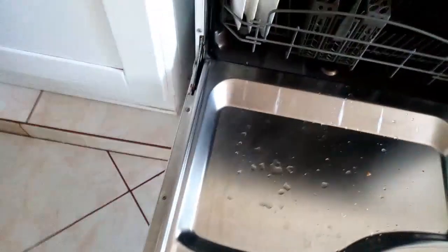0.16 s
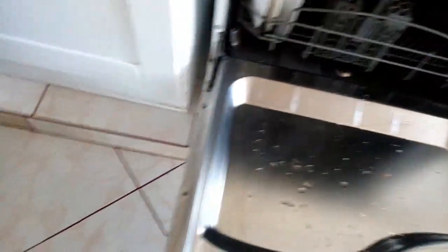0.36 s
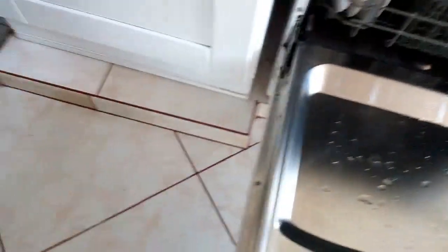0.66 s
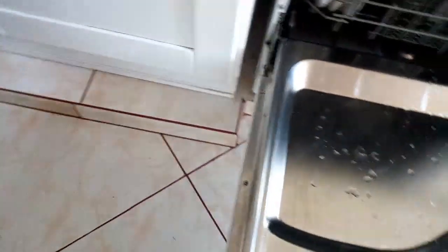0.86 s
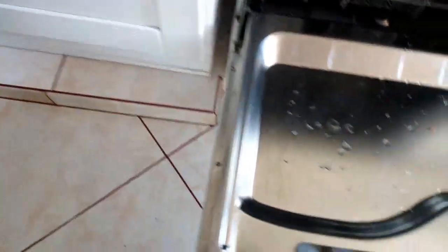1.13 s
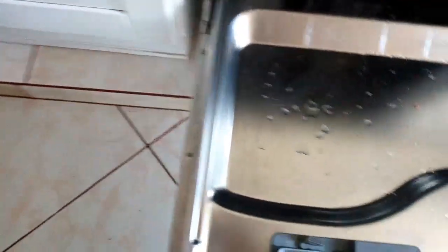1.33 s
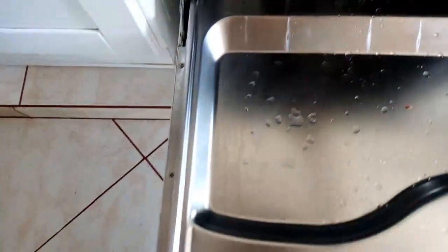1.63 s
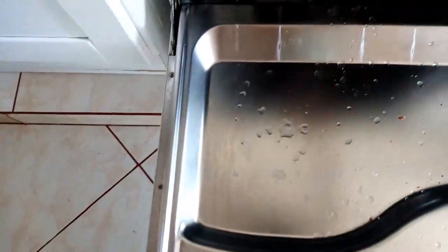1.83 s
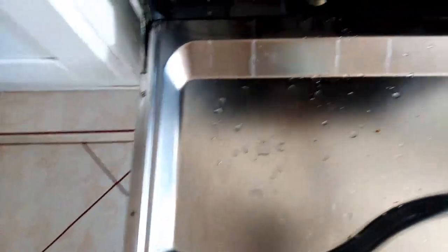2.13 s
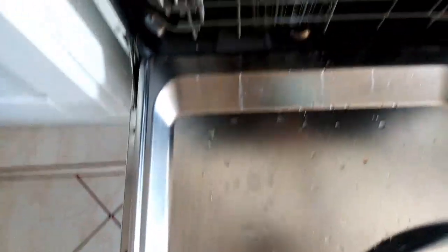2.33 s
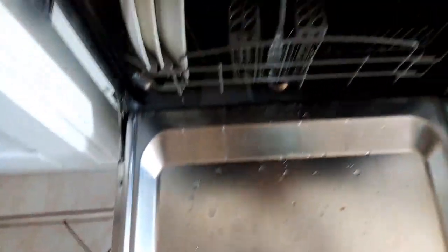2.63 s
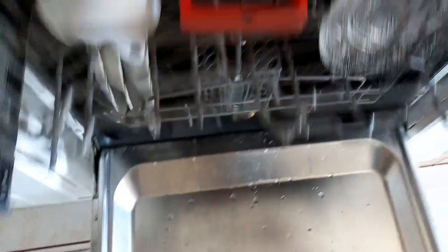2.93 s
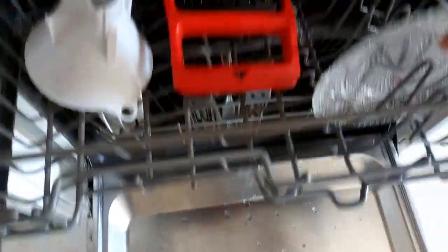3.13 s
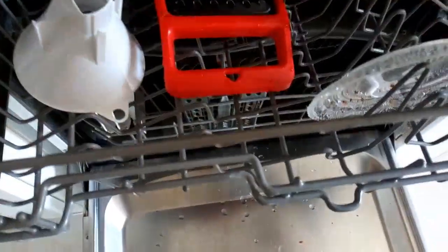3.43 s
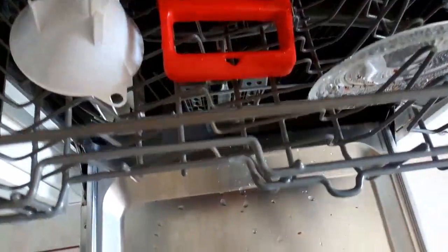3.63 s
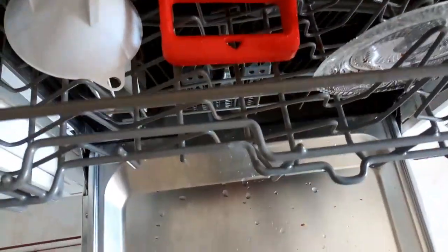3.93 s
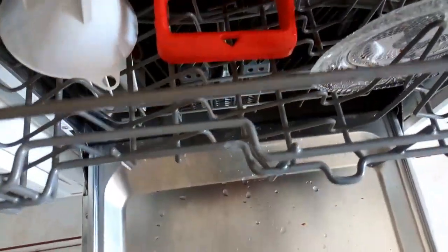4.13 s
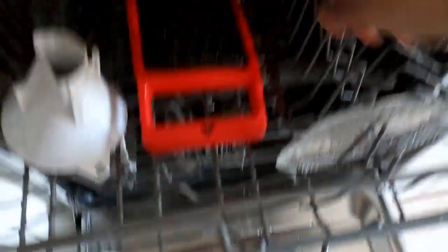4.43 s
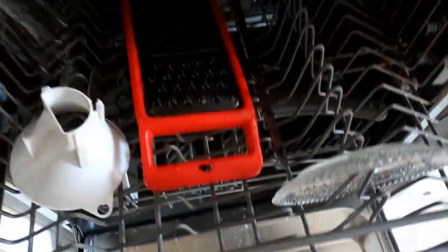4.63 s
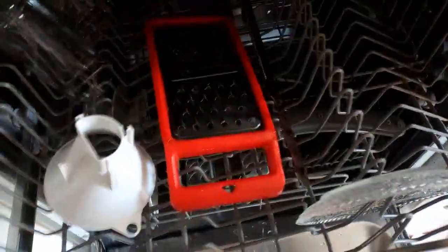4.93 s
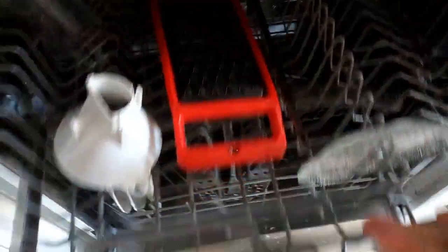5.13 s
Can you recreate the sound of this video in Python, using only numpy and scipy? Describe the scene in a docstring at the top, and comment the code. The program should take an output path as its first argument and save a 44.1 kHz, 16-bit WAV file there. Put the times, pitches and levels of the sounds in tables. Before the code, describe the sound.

Dishwasher racks roll and rattle in a tiled kitchen, with a crockery clatter, a hollow door clunk and sharp glassy clinks on wires.

```python
"""Loading an open dishwasher

Over a faint hush in a tiled kitchen, china scrapes and crockery clatters down a little way off. The door drops
onto its stop, the lower rack rolls out, then the upper rack is pulled and shoved so a glass dish chatters on its wires.
Knocks ring sine modes and coloured noise in door, tub and wires; wheels drive them with random tiny bumps.
The glass is choked sines with a shaken pitch, and decaying noise gives the hard room's echoes."""
import sys
import numpy as np
from scipy import signal
from scipy.fft import rfft, irfft, next_fast_len
from scipy.io import wavfile
from scipy.ndimage import uniform_filter1d

SR = 44100
rng = np.random.default_rng(int(sys.argv[2]) if len(sys.argv) > 2 else 0)


def transcribe(signal):
    """Save signal, clipped to [-1, 1], as a 16-bit WAV file at the path in sys.argv[1]."""
    frames = np.atleast_2d(signal).T
    limited = np.clip(frames, -1, 1)
    pcm = np.round(limited * 32767).astype(np.int16)
    wavfile.write(sys.argv[1], SR, pcm)


N = 232142
AGE = np.arange(int(.7 * SR)) / SR  # time since a blow, s

# main ringing modes of each body: f/Hz, relative level/dB, t60/s
DOOR_MODES = [(90, 3.5, 0.2), (109, 7, 0.052), (128.5, 7.5, 0.15), (194.3, -3, 0.16), (220, -5.5, 0.28),
              (274, -12.5, 0.13), (302.6, -7, .3)]
TUB_MODES = [(325.7, 14, 0.26), (396, -11, 0.17), (469, -2.5, 0.35), (583, 1, 0.21), (626, 1, 0.43),
             (698.4, 13, 0.5), (750, -6, 0.1), (1008, 6, 0.28), (1424, -6.5, 0.14), (1993, 2, 0.11),
             (2114, -9.5, 0.13)]
WIRE_MODES = [(2580, 1, 0.12), (3095, 6.5, 0.18), (3470, -6.5, 0.3), (3760, -5, 0.31), (3900, 13, 0.039),
              (4030, -2, .14), (4640, -5.5, 0.17), (5050, -23.5, .12), (5576, -4, 0.22), (5660, -0.5, 0.13),
              (6080, -1.5, 0.13), (6350, -19, .12)]
CROCKERY_MODES = [(580, -11.5, 0.23), (1002, -13.5, 0.23), (1570, -6, .25), (1900, -1, 0.32),
                  (2060, -1.5, 0.082), (2664, -6.5, .35), (3490, -4.5, 0.28), (4150, -19, .3),
                  (3616, -19, .3), (3980, -2.5, 0.27), (4410, -7, 0.28), (4510, -18, 0.38), (5280, -11, .3),
                  (5760, -7.5, 0.34), (6148, -4, 0.14), (6440, -15, 0.096), (7280, -15.5, 0.4),
                  (9356, -25.5, .3)]

# colour of the crowd of weak, close modes around those: f/Hz, relative density/dB per Hz
DOOR_WASH = [(30, -12.5), (70, -6.5), (120, -1), (220, -2.5), (320, -2.5), (600, -35), (2000, -80)]
TUB_WASH = [(120, -26), (260, 2.5), (650, 3.5), (900, -2.5), (2000, -7), (3000, -11), (5000, -33),
            (9000, -48.5)]
WIRE_WASH = [(400, -39), (1500, -2), (2600, -2), (4200, 13), (5600, 5.5), (6500, 0.5), (7800, -20.5),
             (11000, -51.5), (16000, -57.5)]
CROCKERY_WASH = [(60, -34.5), (200, -14), (530, -2.5), (1100, -3), (2000, 3), (3000, -1), (4500, 1.5),
                 (6000, -3.5), (7000, -14.5), (8000, -23.5), (12000, -33), (15500, -28.5)]


def amp(db):
    """Decibels to gain."""
    return 10 ** (np.asarray(db) / 20)


def unit(x):
    """Scale each row to an energy of 1."""
    return x / np.sqrt(np.sum(x ** 2, axis=-1, keepdims=True))


def fade(t60):
    """An exponential decay that has lost 60 dB after t60 seconds."""
    return np.exp(-np.log(1000) * AGE / t60)


def fft_bins(size):
    """Frequencies of a real spectrum in Hz, kept above zero for the logarithm."""
    return np.maximum(np.arange(size // 2 + 1) * SR / size, 1)


def noise(spectrum, shape, patchy_db=0):
    """Coloured noise of overall rms 1; random humps of patchy_db rms make each row's spectrum its own."""
    hz, db = np.transpose(spectrum)
    size = next_fast_len(shape[-1])
    bins = fft_bins(size)
    hump_width = int(260 * size / SR)  # 260 Hz, in bins
    humps = uniform_filter1d(rng.standard_normal(shape[:-1] + bins.shape), hump_width, mode="wrap")
    colour_db = np.interp(np.log(bins), np.log(hz), db) + patchy_db * humps / humps.std()
    white = rng.standard_normal(shape[:-1] + (size,))
    x = irfft(rfft(white) * amp(colour_db), size)
    return x[..., :shape[-1]] / x.std()


def ring(modes, count, spread_db):
    """Decaying sines for each blow; where it lands sets the strength and sign of every mode."""
    hz, db, t60 = np.transpose(modes)[:, :, None]
    chance = rng.standard_normal((count, 2, len(modes)))
    weights = np.sign(chance[:, 0]) * amp(spread_db * chance[:, 1])
    partials = amp(db) * np.sin(2 * np.pi * hz * AGE) * fade(t60)
    return unit(weights @ partials)


def wash(spectrum, count, t60, patchy_db=2):
    """Modes too close to tell apart, as noise dying away together after each blow."""
    return unit(noise(spectrum, (count, len(AGE)), patchy_db) * fade(t60))


def swell(sounds, rise_s):
    """A soft or rattling contact takes a moment to set things going."""
    return sounds * (1 - np.exp(-AGE / rise_s))


def add_echoes(sounds, room, wet_db):
    """Mix each sound with its echoes, wet_db in energy relative to the dry sound."""
    echoes = signal.fftconvolve(sounds, room[None], axes=1)[:, :len(AGE)]
    return unit(sounds) + amp(wet_db) * unit(echoes)


def play(sounds, times, db, room, wet_db):
    """Give each sound its echoes and set it at its time; db is the rms of its first 25 ms."""
    sounds = add_echoes(sounds, room, wet_db)
    out = np.zeros(N + len(AGE))
    head = int(.025 * SR)
    for sound, s, gain in zip(sounds, times, amp(db)):
        start = int(s * SR)
        out[start:start + len(AGE)] += gain * sound / sound[:head].std()
    return out[:N]


def rub(curve, modes, spectrum, room, bumps_per_s, t60, ring_db):
    """Small bumps of very uneven size, shared by four contacts with their own rings, follow a t/s, drive/dB curve."""
    s, db = curve
    drive_db = np.interp(np.arange(N) / SR, s, db)
    bumps = (rng.random((4, N)) < bumps_per_s / 4 / SR) * rng.laplace(size=(4, N))
    rings = amp(ring_db) * ring(modes, count=4, spread_db=3.5)
    bodies = unit(rings + wash(spectrum, count=4, t60=t60, patchy_db=-3.0))
    bodies = unit(add_echoes(bodies, room, wet_db=-8.5))
    driven = amp(drive_db) * bumps / bumps.sum(0).std()
    return signal.fftconvolve(driven, bodies, axes=1).sum(0)[:N]


def kitchen(build_s):
    """The room's answer: echoes thicken, then die, the treble first."""
    # decay of the hard room: f/Hz, t60/s
    room_decay = [(100, 0.66), (500, 0.53), (2000, 0.56), (5000, 0.46), (9000, 0.36), (15000, 0.14)]
    hz, t60 = np.transpose(room_decay)
    bins = fft_bins(len(AGE))
    echoes = rfft(rng.standard_normal(len(AGE)))
    tail = np.zeros(len(AGE))
    # overlapping bands, each peaking at one listed frequency
    for share, band_t60 in zip(np.eye(len(hz)), t60):
        weight = np.interp(np.log(bins), np.log(hz), share)
        tail += irfft(echoes * weight, len(AGE)) * fade(band_t60)
    return unit(swell(tail, build_s))


def hush():
    """The kitchen's faint background is steady coloured noise."""
    # colour of the hush: f/Hz, relative density/dB per Hz
    hush_colour = [(25, -14.5), (48, 7.5), (70, -8.5), (98, 8.5), (125, -7.5), (220, -5), (320, -10),
                   (1500, -18.5), (1950, -14.5), (2400, -26), (4700, -21.5), (7000, -27.5), (8200, -37.5),
                   (13000, -37.5), (15500, -31)]
    return amp(-68.5) * noise(hush_colour, (N,))


def sliding(room):
    """A dish slides faintly across the room: china scrapes in a dense run of tiny slips."""
    # strength of the scrape: t/s, drive level/dB
    scrape = [(0, -53.5), (.05, -75), (.2, -99), (.28, -65.5), (.38, -73.5), (.48, -85.5)]
    return rub(np.transpose(scrape), CROCKERY_MODES, CROCKERY_WASH, room, bumps_per_s=400, t60=0.21, ring_db=-12.5)


def crockery(room):
    """Plates land and settle in a few quick blows, heard mostly by way of the walls."""
    # crockery set down across the room: t/s, level/dB, brightness/dB per octave
    clatter = [(.055, -50, -4), (.766, -57.5, -0.5), (.786, -50.5, -0.5), (.806, -29, 3.5), (.812, -29, -1),
               (.843, -29, 5), (.858, -29.5, 1.5), (.888, -42.5, -15.5), (.922, -44, 1)]
    s, db, tilt_db = np.transpose(clatter)
    blows = amp(-12) * ring(CROCKERY_MODES, len(s), spread_db=6.5) + wash(CROCKERY_WASH, len(s), t60=0.11)
    blows = swell(blows, rise_s=0.006)
    # the tilt pivots at 2 kHz and levels off below 500 Hz and above 9 kHz
    octaves = np.log2(np.clip(fft_bins(len(AGE)), 500, 9000) / 2000)
    blows = irfft(rfft(blows) * amp(tilt_db[:, None] * octaves), len(AGE))
    return play(blows, s, db, room, wet_db=-0.5)


def taps(modes, table, room, rise_s, wet_db):
    """One loose thing rings with the same modes at each of its taps."""
    s, db = np.transpose(table)
    rings = ring(modes, len(s), spread_db=1.0)
    return play(swell(rings, rise_s), s, db, room, wet_db)


def loose_things(room):
    """A plate, cutlery, a cup and the dish jumped clear of the wires ring their own modes over the clatter."""
    # what loose things ring with: f/Hz, relative level/dB, t60/s
    plate_modes = [(554, 2, 0.18), (2020, 2, .4), (2540, -6, .42), (4290, -0.5, 0.55), (4470, 2.5, 0.29),
                   (4520, -2.5, .25)]
    cutlery_modes = [(533, -6.5, 0.13), (1500, -11, 0.045), (2568, -5.5, 0.13), (2800, -3.5, 0.043),
                     (4400, 0, 0.12), (4605, 5, .08)]
    cup_modes = [(1660, -11.5, .04), (1930, -9.5, 0.043), (2150, -13.5, 0.02), (3350, -6, .09),
                 (3920, 5, 0.036), (5380, -2.5, .045), (5840, -1.5, .05)]
    free_glass_modes = [(3480, 5.5, 0.26), (9350, -17, 0.18)]
    # their taps: t/s, level/dB
    plate_taps = [(.812, -39), (.845, -37)]
    cutlery_taps = [(2.284, -44), (2.615, -46.5)]
    cup_taps = [(3.279, -29), (3.3263, -31)]
    glass_jumps = [(3.34, -49.5), (4.416, -48)]
    return (taps(plate_modes, plate_taps, room, rise_s=0.0027, wet_db=-5.5)
            + taps(cutlery_modes, cutlery_taps, room, rise_s=.0015, wet_db=-14)
            + taps(cup_modes, cup_taps, room, rise_s=.0006, wet_db=-10)
            + taps(free_glass_modes, glass_jumps, room, rise_s=0.0028, wet_db=-23))


def hinge(room):
    """The door meets its hinge stop with one hollow clunk of short modes."""
    # the stop's modes: f/Hz, relative level/dB, t60/s
    hinge_modes = [(1065, -14, 0.039), (1649, -2.5, 0.06), (1725, 0, 0.04), (2600, -21, 0.042),
                   (2800, -3.5, 0.03), (3800, -24.5, 0.13), (5040, -14.5, 0.043), (7500, -27, 0.047)]
    landing_s, landing_db = 1.791, -38
    clunk = swell(ring(hinge_modes, count=1, spread_db=2), rise_s=0.00077)
    return play(clunk, [landing_s], [landing_db], room, wet_db=-9)


def rolling_db(t):
    """The drive of the racks: each move gathers speed, slackens and shivers to rest; the strongest one counts."""
    # a rack on the move: start t/s, end t/s, drive at the start/dB
    rolls = [(2.443, 3.13, -45.5), (3.34, 3.365, -47), (3.978, 4.064, -66), (4.322, 4.36, -50),
             (5.21, 5.26, -45)]
    gather_db_per_s, slacken_db_per_s, settle_db_per_s = 218, 11, 115
    moves = []
    for start, end, db in rolls:
        move_db = db - gather_db_per_s * np.maximum(start - t, 0)
        move_db -= slacken_db_per_s * np.maximum(t - start, 0)
        move_db -= settle_db_per_s * np.maximum(t - end, 0)  # on top of the slackening
        moves.append(move_db)
    return np.max(moves, axis=0)


def wheels(room):
    """Small wheels bump along: the door rumbles, the tub mutters and the loaded wires tremble."""
    s = np.arange(N) / SR
    drive_db = rolling_db(s)
    rumble = rub((s, drive_db - 0.5), DOOR_MODES, DOOR_WASH, room, bumps_per_s=230, t60=0.2, ring_db=-1.5)
    mutter = rub((s, drive_db - 10.5), TUB_MODES, TUB_WASH, room, bumps_per_s=270, t60=0.19, ring_db=-7)
    tremble = rub((s, drive_db - 15.5), WIRE_MODES, WIRE_WASH, room, bumps_per_s=320, t60=.06, ring_db=-10)
    return rumble + mutter + tremble


def knock_levels():
    """Share each knock among the bodies: rows of t/s, boom/dB, rattle/dB, jingle/dB, tick/dB."""
    # the door or a rack strikes the tub: t/s, force/dB, hardness/dB (hard favours the wires, soft the door)
    strikes = [(1.788, -48.5, -8), (2.007, -62.5, -11), (2.378, -45, -8), (3.126, -54.5, -15),
               (4.084, -43, 0), (4.109, -41.5, -1), (4.256, -32.5, 1.5), (4.268, -38, -6),
               (4.298, -37, 3.5), (4.899, -67.5, -7.5), (5.124, -54.5, -11), (5.142, -48.5, 0.5)]
    # a rack jolts on its wheels, or the door rebounds lightly on its stop: t/s, force/dB, hardness/dB
    bumps = [(1.853, -42.5, 0.5), (2.069, -71.5, -16.5), (2.128, -73, -13), (2.486, -54, -11),
             (2.542, -43.5, -7), (2.615, -45, 2), (2.664, -44, -3.5), (2.738, -48.5, -3), (2.855, -48, -6),
             (2.97, -47, -4.5), (3.034, -54.5, -1), (3.294, -41, 5), (3.335, -39, 0.5), (3.464, -67.5, 9.5),
             (5.098, -56, 5.5), (5.187, -40, -1.5)]
    # a wire slips and snaps against its neighbour: t/s, tick level/dB
    snaps = [(2.2852, -46.5), (2.764, -54), (2.792, -53), (3.2795, -50.5), (3.294, -41.5)]
    # a snap's share in each body, relative to its tick: door boom/dB, tub rattle/dB, wire jingle/dB
    snap_shares = (-6, -4, 2.5)
    strike_tub_db, bump_tub_db = 2.5, -9  # the tub's rattle, relative to the force
    tick_db = -27.5  # the sharp edge of a strike or bump, relative to its jingle
    rows = []
    for table, tub_db in ((strikes, strike_tub_db), (bumps, bump_tub_db)):
        for s, force, hard in table:
            rows.append((s, force - hard, force + tub_db, force + hard, force + hard + tick_db))
    for s, db in snaps:
        rows.append((s, *(db + np.array(snap_shares)), db))
    return rows


def knocks(room):
    """Each knock sets the heavy door and the tub going over several milliseconds and the wires almost at once,
    with a sharp tick."""
    # colour of the sharp edge: f/Hz, relative density/dB per Hz
    tick_wash = [(2000, -24), (6000, -1), (8000, -6), (10500, -8.5), (13500, -13.5), (15500, -1.5)]
    s, boom_db, rattle_db, jingle_db, tick_db = np.transpose(knock_levels())
    count = len(s)
    boom = ring(DOOR_MODES, count, spread_db=5.5) + amp(-3.5) * wash(DOOR_WASH, count, t60=0.11)
    rattle = amp(-9.5) * ring(TUB_MODES, count, spread_db=3) + wash(TUB_WASH, count, t60=0.12, patchy_db=3.5)
    snap = wash(WIRE_WASH, count, t60=0.019, patchy_db=12.5)
    wires = ring(WIRE_MODES, count, spread_db=3)
    jingle = amp(-8) * wires + wash(WIRE_WASH, count, t60=0.13, patchy_db=6.0) + amp(-4.0) * snap
    tick = wash(tick_wash, count, t60=0.08, patchy_db=10.0)
    return (play(swell(boom, rise_s=0.0085), s, boom_db, room, wet_db=-10.0)
            + play(swell(rattle, rise_s=0.0096), s, rattle_db, room, wet_db=-5.5)
            + play(swell(jingle, rise_s=0.00095), s, jingle_db, room, wet_db=-14)
            + play(tick, s, tick_db, room, wet_db=-12.0))


def glass(room):
    """The dish rings and buzzes on the wires until they choke it; each contact wakes the upper partials differently."""
    # the dish touching the wires: t/s, level/dB, upper partials/dB
    contacts = [(3.2698, -40.5, -11.5), (3.2933, -23.5, -1.5), (3.302, -28.5, -4), (3.3355, -26.5, 5),
                (3.465, -53, 10.5), (4.086, -42, -23), (4.175, -52, -3), (4.2577, -21, 0.5),
                (4.313, -32.5, -4.5), (4.323, -29, -4), (4.346, -33, -6), (4.4103, -35, 5.5),
                (4.522, -48, 3.5), (4.938, -69.5, -12.5), (5.011, -65.5, -17.5)]
    # the dish's partials: f/Hz, relative level/dB, ring time relative to choke_s/ratio
    glass_partials = [(3375, -17, 1.2), (3940, -10, .8), (4075, -6, 1), (4108, 0, 1.1), (4200, -13, .6),
                      (5400, -19, .7), (6412, -9, 1.1), (6480, -14, .9), (7400, -29, .5), (8340, -42, 1.6),
                      (9370, -39, 2.2), (10390, -45, 1.3)]
    choke_s = 0.013  # how long the dish rings before the wires choke it
    buzz_hz = 49.6  # rms pitch shake from the chatter
    hz, db, lasting = np.transpose(glass_partials)[:, :, None]
    upper = hz > 5000
    choke = np.exp(-np.minimum((AGE / (choke_s * lasting)) ** 2, 20))
    s, level_db, upper_db = np.transpose(contacts)
    clinks = []
    for lift_db in upper_db:
        # chatter shakes the pitch, smoothly from one millisecond to the next
        jostle = noise([(300, 0), (600, -20), (1200, -70)], AGE.shape)
        buzz_phase = 2 * np.pi * buzz_hz * np.cumsum(jostle) / SR
        chance = rng.standard_normal(hz.shape)
        strength = amp(db + upper * lift_db + 2 * chance)
        partials = strength * np.sin(2 * np.pi * hz * AGE + buzz_phase) * choke
        clinks.append(np.sum(partials, axis=0))
    return play(swell(np.array(clinks), rise_s=0.0036), s, level_db, room, wet_db=-15)


def scene():
    """Everything sounds in the one kitchen, over its faint hush."""
    room = kitchen(build_s=0.002)
    mix = hush()
    for source in (sliding, crockery, loose_things, hinge, wheels, knocks, glass):
        mix = mix + source(room)
    return mix[None]


def record(dry):
    """The phone's small microphone thins the deep bass, and the top is cut."""
    bass_hz, top_hz = 50, 15900
    thinned = signal.sosfilt(signal.butter(2, bass_hz, "highpass", fs=SR, output="sos"), dry)
    return signal.sosfilt(signal.ellip(10, .2, 80, top_hz, fs=SR, output="sos"), thinned)


dry = scene()
out = record(dry)
transcribe(out)
```